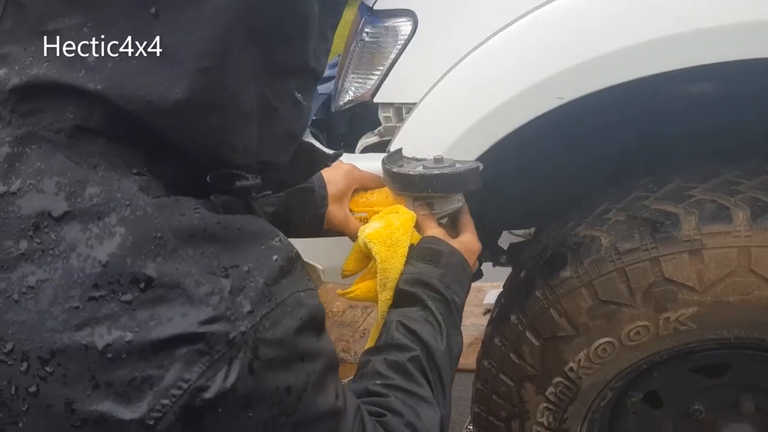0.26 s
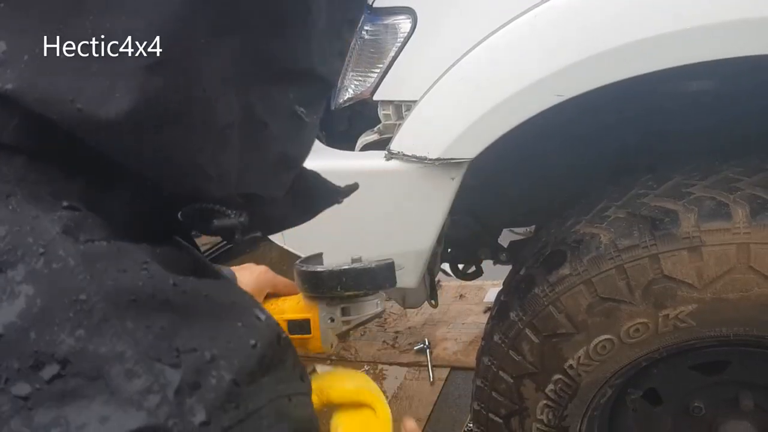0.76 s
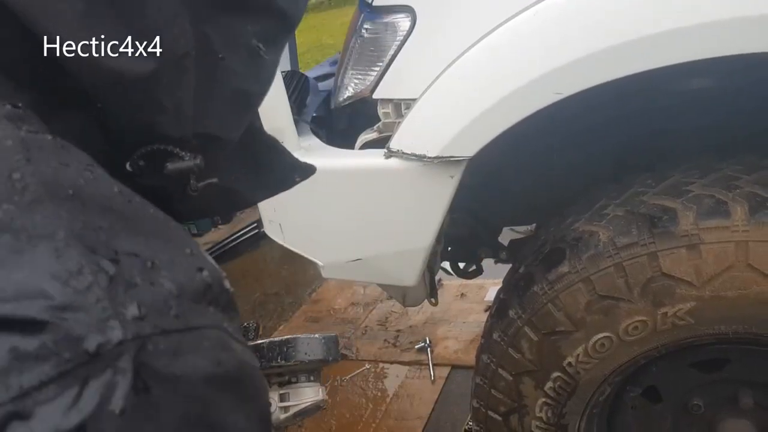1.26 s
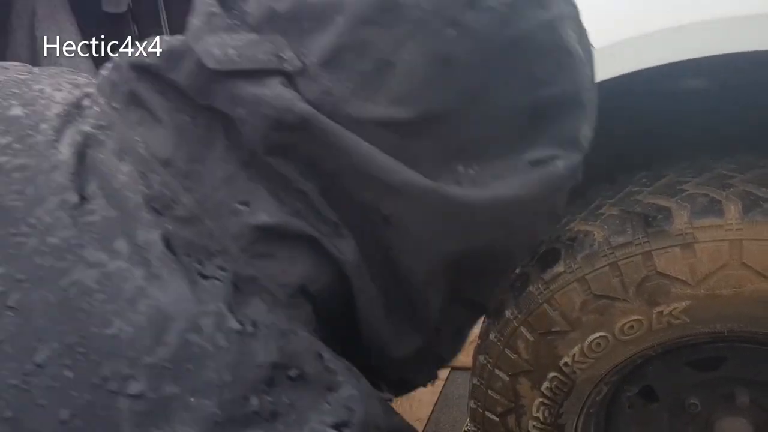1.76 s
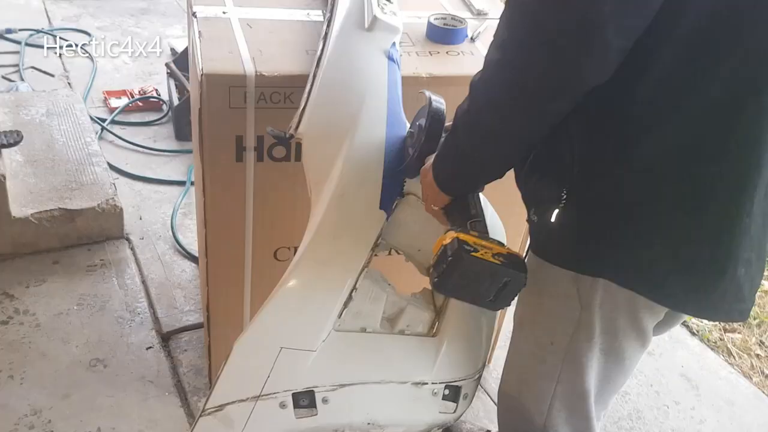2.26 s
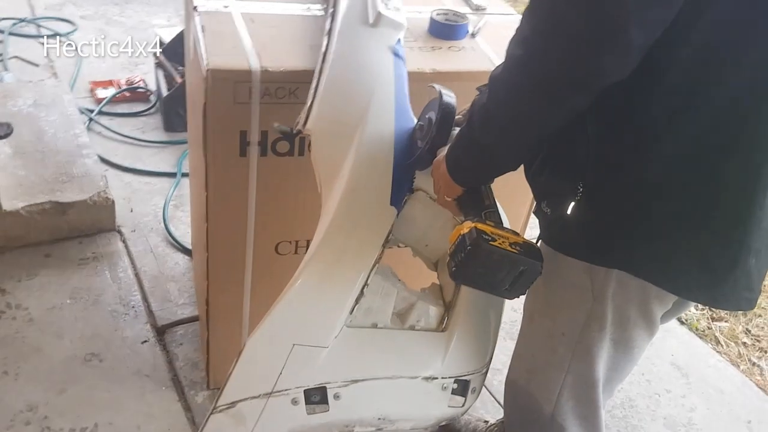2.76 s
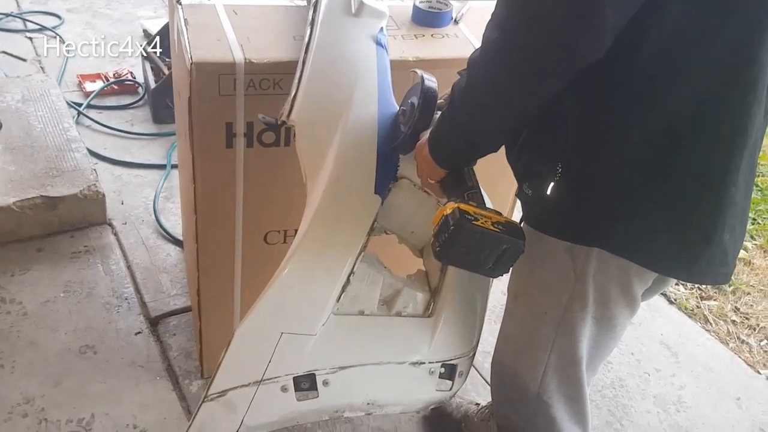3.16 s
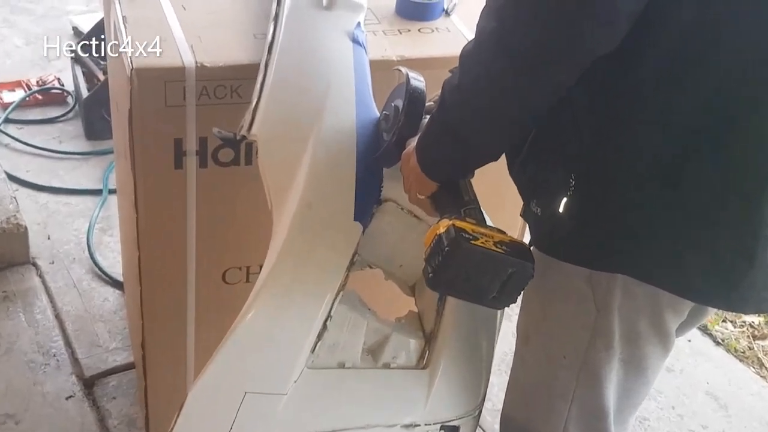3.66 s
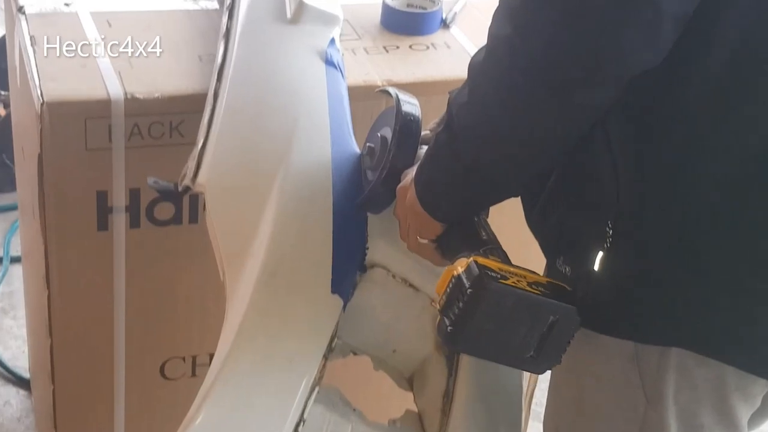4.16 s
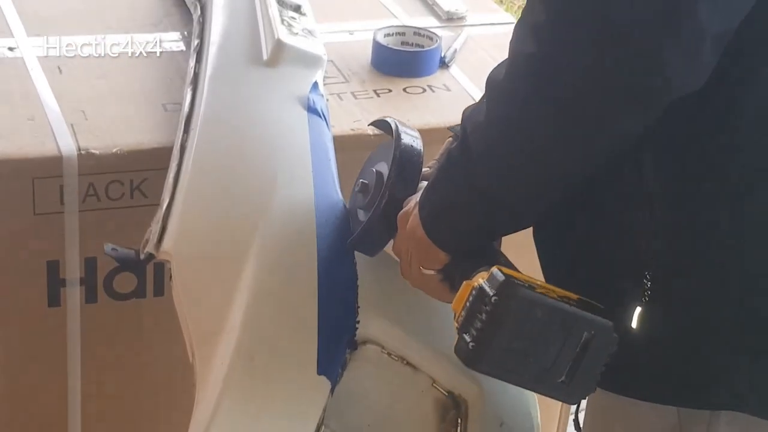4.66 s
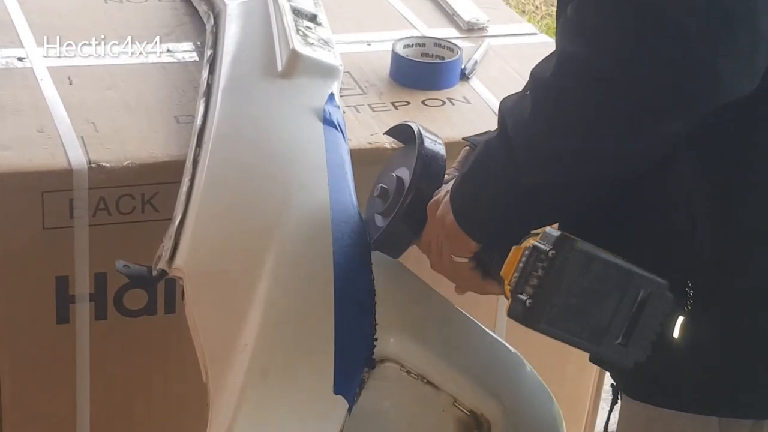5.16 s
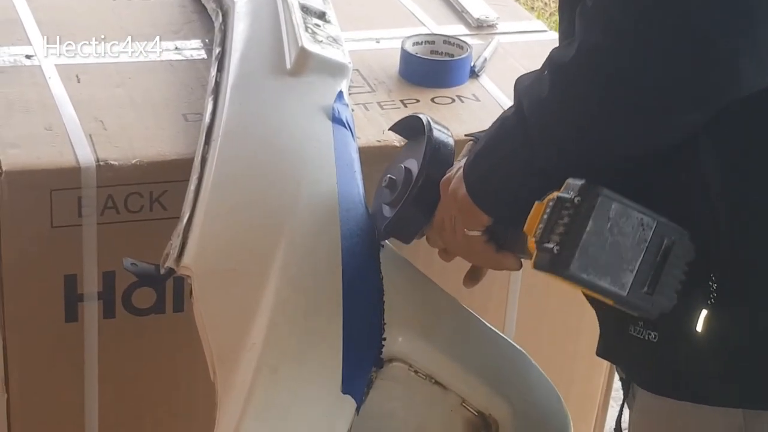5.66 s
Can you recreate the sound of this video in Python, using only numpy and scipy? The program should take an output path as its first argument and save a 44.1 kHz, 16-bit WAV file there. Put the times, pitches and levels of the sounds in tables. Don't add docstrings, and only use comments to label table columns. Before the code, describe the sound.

A grinder is already cutting at the start, loud and gritty, then leaves the slot and becomes a quieter steady hiss with a high gear whine that swells and fades. A short fade cuts to another take: the disc chews a loose panel, fuller and buzzing, bogging lowest before five seconds, then speeding up. Dry close outdoor stereo, stronger on the left, with faint wind thumps.

```python
import sys
import numpy as np
from scipy import signal
from scipy.fft import rfft, irfft, next_fast_len
from scipy.io import wavfile
from scipy.ndimage import uniform_filter1d

SR = 44100
rng = np.random.default_rng(int(sys.argv[2]) if len(sys.argv) > 2 else 0)


def store_pcm(level_fs):
    pcm = np.round(np.clip(level_fs, -1, 1) * 32767).astype(np.int16)
    wavfile.write(sys.argv[1], SR, np.atleast_2d(pcm).T)


def undo_db(level):
    steps = np.asarray(level, float) / 20
    return 10 ** steps


N = 260322

# start in seconds, end in seconds.
STAGES = [
    (0, .45),
    (.45, 2.27),
    (2.345, 5.9),
]
SCENE_CHANGE_S, FADE_OUT_S, FADE_IN_S = 2.308, .05, .047

FIRST_TURNS_PER_S, MESH_ORDER, USUAL_SPEED = 123.2, 28.575, 120
INERTIA_S = .04
WANDER_CYCLES = .07
LET_GO_S, LET_GO_HALF_S, LET_GO_RACE = .46, .05, .007
# time in seconds, speed in turns per second.
SPEED = [(2.35, 123.6), (2.46, 122.6), (2.52, 121.5), (2.87, 121.4), (2.96, 120.2), (3.06, 118.5),
         (3.25, 119.2), (3.32, 120.2), (3.68, 118.5), (3.72, 117.2), (3.77, 117.6), (3.93, 121.8),
         (3.99, 120.8), (4.23, 124.0), (4.39, 123.3), (4.46, 120.9), (4.59, 113.6), (4.63, 112.7),
         (4.77, 113.1), (4.91, 112.5), (5.0, 113.5), (5.13, 120.5), (5.3, 124.0), (5.68, 123.5),
         (5.9, 123.6)]

# time in seconds, pressure on the disc in dB, grip on the panel in dB.
FIRST_CUT = [
    (0, 0, -28.5),
    (.11, 1, -30),
    (.19, 2.5, -30),
    (.25, 4.5, -30.5),
    (.31, -1, -24),
    (.385, -4, -23),
    (.44, -3, -35),
    (.475, -20, -37.5),
    (.53, -16, -59),
]
USUAL_GRIP_DB = -30
# time in seconds, level in dB.
FREE_RUN = [(.47, -28), (.79, -27), (.88, -27.5), (1.1, -25.5), (1.42, -26.5), (1.62, -25), (1.96, -26.5),
            (2.14, -24.5), (2.27, -24)]
# time in seconds, pressure in dB.
SECOND_CUT = [(2.35, -19.5), (2.5, -21), (2.849, -21), (3.001, -19.5), (3.1, -19.5), (3.2, -20.5),
              (3.5, -20), (3.65, -20.5), (3.8, -19.5), (3.95, -19), (4.05, -18.5), (4.2, -20), (4.449, -16),
              (4.6, -15.5), (4.8, -17.5), (5.0, -17.5), (5.3, -20.5), (5.9, -20)]

RIM_STEPS = 1024
EVENNESS = .25
SETTLED_S = 1.62
# frequency in Hz, then the share (0-1) in the first cut,
# running free, in the second cut chattering, in the second cut running true.
REPEAT = [(500, .9, .08, .87, .9), (1400, .86, .08, .8, .84), (2800, .86, .08, .64, .8),
          (4300, .68, .05, .5, .76), (5800, .56, .04, .44, .58), (8100, .48, .04, .4, .46),
          (11500, .55, .03, .42, .84), (15000, .4, .03, .38, .5)]
# time in seconds, trueness (0 chattering, 1 true
RUNS_TRUE = [(2.35, .7), (2.9, 1), (3.05, .45), (3.6, .4), (3.85, .1), (4.38, .1), (4.5, -.3), (4.65, .5),
             (4.95, .5), (5.08, -.3), (5.25, 0), (5.9, 0)]
# lower edge in Hz, upper edge in Hz.
HISS_BANDS = [
    (150, 1200),
    (1200, 5000),
    (5000, 9000),
    (9000, 15500),
]
HISS_TRIM_DB = [
    (-8, -1.7, 0, 0),
    (7.5, -0.47, 0, 0),
    (-5.5, -2, 0, 0),
]
# level at the start in dB, share of the pressure swing,
# growth in dB per second, response in dB per unit of grip or speed.
HISS_LAW = [
    [(-34, 0.099, 21, 1), (-30.5, 0.54, 0.5, 0.62), (-35, 1, -8, 1.53), (-19.5, 0.87, -4.5, 0.75)],
    [(-61, 0.059, 6.5, 0), (-33, 0.86, -0.74, 0), (-32, 1.9, -2.1, 0), (-24, 1.2, -1, 0)],
    [(-28.5, 0.51, 1.06, 0.36), (-23, 1.08, -1.04, 0.25), (-33, 0.44, 4, 0.05), (-18.5, 1.08, -1.83, 0.14)],
]
# frequency in Hz, density in dB per Hz.
COLOUR = [
    [(53, -57), (90, -30.5), (188, -13), (243, -3), (309, -9), (367, -8), (427, -10), (872, -8),
     (1630, -21), (3630, -13), (8620, -18), (10900, -17), (15800, -26)],
    [(53, -44), (90, -23.5), (260, -23.5), (436, -21.5), (570, -22.5), (720, -18.5), (880, -20.5),
     (1040, -15), (1780, -14), (2410, -8.5), (3190, -9), (3400, -11), (3710, -7), (8620, -19), (9200, -18),
     (10900, -15.5), (15800, -31)],
    [(53, -48), (90, -7), (196, -5.5), (238, -20), (340, -2), (486, 1.5), (530, -7), (853, -1), (1040, -5),
     (3870, -2), (4600, -8.5), (5600, -10.5), (6800, -5.5), (8440, -13), (10900, -5.5), (15800, -21)],
]
# centre in Hz, width in Hz, #
# height in dB.
PEAK_AND_DIPS = [
    (10940, 900, 3),
    (7800, 370, -0.5),
    (4490, 510, -1.5),
    (8410, 140, -3),
]

FIRST_ORDERS = (2, 3, 4, 7, 5, 6, 8, 9, 10, 11, 12)
# level over the grip in dB, share of the swing in grip.
FIRST_HUM = [(-2, 1.18), (-14.5, 1.4), (-23.5, 1.1), (-20.5, 1.7), (-38, 1.4), (-25, 1.7), (-31, 1.2),
             (-31, 2.7), (-28, 2), (-28, 2), (-28.5, 1.2)]
OPENING_ORDERS = (20, 23, 26, 32, 42)
OPENING_REST_DB = -49.5
# middle in seconds, half length in seconds, level in dB.
OPENING_SWELLS = [
    [(.27, .04, -36), (.4, 0.034, -47)],
    [(.07, .08, -40)],
    [(.07, 0.074, -46), (.4, 0.018, -41)],
    [(.22, .07, -41)],
    [(.275, 0.018, -34)],
]

# middle in seconds,
# half length in seconds, level in dB.
HUM_ORDERS = (2, 4, 6, 7)
HUM_REST = [(-40, 0.5), (-76, 2), (-45, -0.84), (-78.5, 7)]
HUM_SWELLS = [
    [(4.263, 0.3, -44)],
    [(2.62, 0.21, -39), (3.1, 0.27, -37), (3.5, 0.17, -33.5), (4.03, 0.24, -29.5), (4.45, 0.11, -29.5),
     (5.55, 0.39, -34.5)],
    [(3.2, 1, -51), (3.68, 0.49, -41.5), (5.07, 0.022, -43), (5.85, 0.5, -37)],
    [(3.2, 0.61, -45.5), (4.04, 0.085, -34), (4.28, 0.29, -35), (4.58, 0.024, -39), (4.84, 0.018, -58),
     (5.05, 0.032, -34.5), (5.65, 0.53, -30.5)],
]
BUZZ_ORDERS = (1, 3, 9, 12, 14)
BUZZ_REST = [(-52.5, 0.23), (-75.5, 0.19), (-49, 0.22), (-45, 0.37), (-45, 0.15)]
BUZZ_SWELLS = [
    [(2.38, 0.056, -64), (2.62, 0.12, -59.5), (3.05, 0.029, -57), (4.3, 0.042, -49), (5.11, 0.059, -61),
     (5.6, 0.27, -49)],
    [(2.72, 0.41, -49), (3.58, 0.15, -45), (4.2, 0.41, -37.5), (4.78, 0.17, -51), (5.21, 0.085, -43),
     (5.6, 0.66, -41)],
    [(4.1, 0.22, -49), (4.48, 0.1, -43), (4.97, 0.1, -44), (5.65, 0.37, -44)],
    [(2.9, 0.21, -41.5), (4.33, 0.28, -40.5), (5.1, 0.13, -47), (5.75, 0.43, -48)],
    [(2.8, 0.25, -49), (4.15, 0.26, -40)],
]
WHINE_ORDERS = (28.47, 25, 27, 32)
WHINE_REST = [(-45, -0.27), (-58, -0.49), (-43.5, -0.63), (-37, -0.36)]
WHINE_SWELLS = [
    [(2.46, 0.045, -32), (2.85, 0.27, -38), (3.65, 0.15, -34), (5.2, 0.22, -46), (5.55, 0.1, -38)],
    [(2.72, 0.33, -33), (4.05, 0.67, -38.5), (4.35, 0.042, -39), (4.73, 0.14, -39.5), (5.5, 0.85, -34.5)],
    [(2.37, 0.07, -33), (2.8, 0.17, -34.5), (4.75, 0.43, -45)],
    [(2.46, 0.011, -30), (2.78, 0.33, -42), (3.9, 0.19, -43), (4.3, 0.13, -57), (4.5, 0.062, -31),
     (4.92, 0.068, -45), (5.12, 0.065, -48), (5.8, 0.19, -43)],
]
SLOT_ORDERS = (8, 10, 13, 15, 17, 23, 24, 28)
SLOT_REST = [(-54, 0.22), (-50.5, 0.13), (-51.5, -0.033), (-50.5, -0.11), (-52.5, -.1), (-44.5, -0.15),
             (-45, -0.41), (-44, 0.043)]
SLOT_SWELLS = [
    [(4.8, 0.42, -43.5), (5.65, 0.31, -43)],
    [(4.15, 0.24, -53), (5.7, 0.41, -51)],
    [(3.1, 0.081, -50), (3.65, 0.48, -44.5), (4.6, 0.36, -47)],
    [(2.5, 0.27, -42), (4.95, 0.28, -49.5)],
    [(2.95, 0.52, -46), (4.0, 0.13, -45), (4.72, 0.31, -48)],
    [(2.85, 0.12, -58), (3.95, 0.52, -40.5)],
    [(2.42, 0.056, -42), (4.0, 0.13, -55), (4.35, 0.1, -37), (5.4, 0.14, -41)],
    [(2.45, 0.03, -42), (4.3, 0.3, -49), (4.7, 0.24, -39)],
]
EDGE_ORDERS = (5, 11, 16, 19, 85, 91, 96)
EDGE_REST = [(-52.5, .05), (-49.5, .05), (-50, .05), (-49, .05), (-55, .05), (-44, .05), (-53, .05)]
EDGE_SWELLS = [
    [(2.42, 0.13, -44.5), (3.2, 0.65, -51), (4.2, 0.69, -51), (4.45, 0.04, -44), (4.75, 0.12, -55),
     (5.03, 0.23, -46), (5.5, 0.18, -46), (5.82, 0.09, -52)],
    [(4.15, 0.67, -48), (5.35, 0.24, -51), (5.7, 0.39, -53)],
    [(2.45, 0.06, -45), (3.8, 0.57, -60), (4.78, 0.054, -45), (5.5, .15, -63)],
    [(2.45, 0.39, -46), (4.0, 0.082, -60), (4.7, 0.29, -41), (5.45, 0.16, -43)],
    [(2.5, 0.16, -23.5), (5.55, .35, -57)],
    [(2.7, 0.16, -24.5), (3.15, 0.11, -40), (4.27, .15, -29)],
    [(4.75, .12, -38)],
]
STACK_ORDERS = (18, 20, 21, 22, 26, 29, 30, 31, 33, 35, 89, 94)
STACK_REST = [(-51.5, .1), (-46.5, .1), (-46, .05), (-46, 0.12), (-45, .05), (-50, -.1), (-47, -.1),
              (-41.5, -.1), (-51.5, 0.017), (-53, -.2), (-53, .05), (-59, .05)]
STACK_SWELLS = [
    [(4.3, 0.42, -46.5), (5.3, .15, -47)],
    [(2.45, .1, -40), (3.7, .3, -46), (4.2, 0.14, -53)],
    [(2.5, 0.2, -54), (3.7, 0.22, -44), (4.1, 0.11, -40), (4.5, 0.13, -44)],
    [(4.25, .3, -44.5), (5.5, .45, -47)],
    [(3.1, 0.24, -42), (4.7, 0.16, -39), (5.4, 0.47, -53)],
    [(3.9, 0.15, -44), (4.6, 0.14, -37)],
    [(2.6, 0.42, -50), (4.2, .2, -41), (4.75, 0.17, -42)],
    [(2.8, 0.17, -41), (3.4, 0.23, -47), (4.7, 0.09, -37)],
    [(2.45, 0.13, -55), (4.0, 0.22, -45), (5.2, 0.57, -61)],
    [(2.9, 0.61, -39), (4.6, 0.28, -43)],
    [(3.15, 0.28, -31.5), (5.55, 0.088, -35)],
    [(2.63, .25, -28), (2.43, 0.067, -34)],
]

# middle in seconds,
# half length in seconds, level in dB.
MESH_SWELLS = [(.14, 0.16, -47), (.46, 0.036, -36.5), (.6, 0.044, -51), (.75, 0.047, -36),
               (.92, 0.085, -47), (1.11, 0.1, -33), (1.33, 0.06, -38.5), (1.65, 0.13, -38),
               (1.82, .08, -32.5), (1.97, 0.04, -42), (2.14, 0.044, -31.5)]
MESH_REST_DB = -44
# ratio to mesh, level in dB.
MESH_PARTNERS = [
    (0.6893, -16),
    (0.9628, -18),
    (1.0718, -19),
    (1.998, -18),
    (2.3736, -9),
]
# ratio to mesh, level in dB.
ARMATURE = [(.1253, -60), (0.037, -61.5)]
ARMATURE_TURNS_S, ARMATURE_HIDDEN_DB = 1.3, -4.5
SWELL_SQUARENESS = 2.26

# frequency in Hz, left minus right in dB.
LEFT_LEAN = [(60, 1.5), (92, -6), (140, 19), (210, 4), (330, 7), (500, 9.5), (770, 17.5), (1170, 7),
             (1790, 17.5), (2740, 6.5), (4190, 4), (6410, 13.5), (9810, 16.5), (15000, -6)]
# frequency in Hz, correlation.
LIKENESS = [(100, 0.3), (300, 0.44), (700, 0.056), (1500, 0.11), (4000, 0.063), (10000, 0.12),
            (15000, 0.041)]
# frequency in Hz, phase in radians.
LEFT_LEADS = [(240, 0.28), (450, 0.47), (900, 0.67), (2000, 0.24), (5000, 0.074)]
FULL_LEAN_HZ, PORT_WANDER = 493, 0.71
FACES_PORTS_S, FACING_LIKENESS = 3.83, 0.23
# time in seconds, left minus right in dB plus 10.5.
PLACE = [(0, 9), (.75, 8), (1.25, 4.5), (1.75, 5.5), (2.3, 8), (2.32, 12), (2.8, 12.5), (3.2, 11),
         (4.2, 9.5), (4.75, 9), (5.9, 9.5)]
HAND_SHAKE_DB, HAND_SHAKE_PER_S = 0.73, 11

# middle in seconds, half length in seconds, level in dB.
GUSTS = [(.2, 0.19, -63.5), (0.805, 0.032, -73), (1.195, 0.018, -51), (1.324, 0.036, -60),
         (1.525, 0.04, -64), (1.84, 0.014, -57), (2.035, 0.028, -59), (2.303, 0.17, -71.5),
         (3.15, 0.051, -58), (3.974, 0.047, -56), (4.096, 0.089, -52), (4.6, .04, -60), (4.703, 0.13, -59),
         (5.01, 0.053, -58), (5.41, 0.094, -57), (5.793, 0.026, -64), (5.907, 0.017, -47)]
WIND_REST_DB = -72
CUTOFF_HZ = 15820


def unit(x):
    return x / np.sqrt(np.mean(x ** 2) + 1e-20)


def in_time(rows):
    s, *columns = np.transpose(rows)
    return [np.interp(np.arange(N) / SR, s, c) for c in columns]


def at_hz(points, hz):
    f, value = np.array(points)[:, :2].T
    return np.interp(np.log(hz), np.log(f), value)


def drift(rate, count):
    r = np.exp(-80 * np.pi * rate / SR)
    fresh = rng.standard_normal(count // 40 + 2002)
    slow = signal.lfilter([1], [1, -2 * r, r * r], fresh)[2000:]
    return np.interp(np.arange(count) / 40, np.arange(len(slow)), unit(slow))


def swells(rest_db, rows):
    at = np.arange(0, N, 64)
    rise = sum(undo_db(db) * np.exp(-np.abs((at / SR - s) / half_s) ** SWELL_SQUARENESS) for s, half_s, db in rows)
    rest = undo_db((rest_db + np.zeros(N))[at])
    return np.interp(np.arange(N), at, 20 * np.log10(rest + rise))


def rim(turns, memory, steady):
    fresh = rng.standard_normal((2, 800, RIM_STEPS))
    worn = signal.lfilter([1], [1, -memory], fresh, axis=1)[:, 60:]
    orders = rfft(worn)
    orders *= (np.abs(orders) + 1e-9) ** -EVENNESS
    orders[..., steady] *= .17
    bumps = irfft(orders).reshape(2, -1)
    bumps = signal.sosfilt(signal.butter(8, .29, output="sos"), bumps)
    return unit(np.array([np.interp(turns * RIM_STEPS, np.arange(len(b)), b) for b in bumps]))


def spray(turns, gate):
    press = 1 + gate * (np.cos(2 * np.pi * turns) + 0.11 * np.cos(4 * np.pi * turns + 1))
    return unit(rng.standard_normal((2, N)) * press)


def hiss_db(stage):
    pressure, grip = in_time(FIRST_CUT)
    free, second = (in_time(rows)[0] - np.mean(rows, axis=0)[1] for rows in (FREE_RUN, SECOND_CUT))
    sag = in_time(SPEED)[0] - USUAL_SPEED
    push, load = [(pressure, grip - USUAL_GRIP_DB), (free, 0), (second, sag)][stage]
    since = np.minimum(np.arange(N) / SR - STAGES[stage][0], SETTLED_S)
    return np.array([db + share * push + per_s * since + per_load * load
                     for db, share, per_s, per_load in HISS_LAW[stage]])


def hiss(stage, repeating, fresh, patchy_db, low_patchy_db):
    start = max(0, int((STAGES[stage][0] - .06) * SR))
    stop = min(N, int((STAGES[stage][1] + .06) * SR))
    count = stop - start
    size = next_fast_len(count)
    hz = np.maximum(np.arange(size // 2 + 1) * SR / size, 1)
    mid, other = rfft(np.stack([repeating, fresh], axis=1)[..., start:stop], size)
    port_db = sum(db / (1 + (2 * (hz - centre_hz) / width_hz) ** 2) for centre_hz, width_hz, db in PEAK_AND_DIPS)
    colour = undo_db(at_hz(COLOUR[stage], hz) + port_db)
    lean = undo_db(at_hz(LEFT_LEAN, hz) / 2)
    parts = np.stack([mid * lean, mid * np.exp(-1j * at_hz(LEFT_LEADS, hz)) / lean, other / lean], axis=1)
    parts = parts * colour / np.sqrt((lean ** 2 + lean ** -2 + 2 * at_hz(LIKENESS, hz)) / 4)
    band_db = [10 * np.log10(2 * np.sum(colour[(hz > a) & (hz < b)] ** 2) / size) for a, b in HISS_BANDS]
    gains = hiss_db(stage)[:, start:stop] + np.subtract(HISS_TRIM_DB[stage], band_db)[:, None]
    true = in_time(RUNS_TRUE)[0][start:stop] * (stage == 2)
    facing = np.clip((np.arange(start, stop) / SR - FACES_PORTS_S) / .3 + .5, 0, 1)
    shares = np.array(REPEAT)
    best_column = 4 if stage == 2 else stage + 1
    out, together = np.zeros((2, N)), drift(2.8, count)
    for centre in 90 * 2 ** np.arange(0, 8, .5):
        window = np.cos(np.pi * np.clip(np.log2(hz / centre), -.5, .5)) ** 2
        bumps, chips = irfft(parts * window, size)[..., :count]
        place = np.interp(np.log(centre), np.log([500, 2800, 6700, 11000]), range(4))
        below, above = gains[int(place)], gains[min(int(place) + 1, 3)]
        level = below + (place % 1) * (above - below)
        usual = at_hz(shares[:, [0, stage + 1]], centre)
        best = at_hz(shares[:, [0, best_column]], centre)
        share = np.clip(usual + true * (best - usual), .02, .98)
        own_db = 1.4 * patchy_db + low_patchy_db * (centre < 1300)
        flicker = patchy_db * together + own_db * drift(3.3, count)
        left, same, apart = undo_db(level + flicker) * (np.sqrt(share) * bumps + np.sqrt(1 - share) * chips)
        alike = np.clip(at_hz(LIKENESS, centre) + FACING_LIKENESS * facing * (centre > 2500), 0, .99)
        out[:, start:stop] += [left, alike * same + np.sqrt(1 - alike ** 2) * apart]
    return out


def tone(cycles, level_db, lean_db, wobble_db):
    hz = cycles[-1] * SR / N
    phase = 2 * np.pi * (cycles + rng.random() + WANDER_CYCLES * drift(9.4, N))
    height = np.sqrt(2) * undo_db(level_db + wobble_db * drift(9, N))
    lag = at_hz(LEFT_LEADS, hz) + PORT_WANDER * min(hz / FULL_LEAN_HZ, 1.6) * drift(4.6, N)
    lean = undo_db(lean_db * min(hz / FULL_LEAN_HZ, 1) / 2)
    return height * np.array([lean * np.sin(phase), np.sin(phase - lag) / lean])


def lines(turns, orders, levels_db, lean_db, wobble_db):
    return sum(tone(k * turns, db, lean_db, wobble_db) for k, db in zip(orders, levels_db))


def rung(rest, rows, speed):
    return [swells(db + per_turn * (speed - USUAL_SPEED), own) for (db, per_turn), own in zip(rest, rows)]


def first_panel(turns):
    grip = in_time(FIRST_CUT)[1] - USUAL_GRIP_DB
    hum_db = [USUAL_GRIP_DB + db + share * grip for db, share in FIRST_HUM]
    opening_db = [swells(OPENING_REST_DB, own) for own in OPENING_SWELLS]
    hum = lines(turns, FIRST_ORDERS, hum_db, lean_db=6.5, wobble_db=.8)
    return hum + lines(turns, OPENING_ORDERS, opening_db, lean_db=4.0, wobble_db=2.0)


def loose_panel(turns, speed):
    families = [(HUM_ORDERS, HUM_REST, HUM_SWELLS, 6.0, .8), (BUZZ_ORDERS, BUZZ_REST, BUZZ_SWELLS, 6.5, 1.0),
                (WHINE_ORDERS, WHINE_REST, WHINE_SWELLS, 7.0, 2.5),
                (SLOT_ORDERS, SLOT_REST, SLOT_SWELLS, 13.5, 2.5),
                (EDGE_ORDERS, EDGE_REST, EDGE_SWELLS, 5.5, 2.0),
                (STACK_ORDERS, STACK_REST, STACK_SWELLS, 6.0, 3.0)]
    return sum(lines(turns, orders, rung(rest, rows, speed), lean_db, wobble_db)
               for orders, rest, rows, lean_db, wobble_db in families)


def gears_free(turns):
    t = np.arange(N) / SR
    race = LET_GO_RACE * np.exp(-((t - LET_GO_S) / LET_GO_HALF_S) ** 4)
    cycles = MESH_ORDER * np.cumsum(np.gradient(turns) * (1 + race))
    mesh = tone(cycles, swells(MESH_REST_DB, MESH_SWELLS), lean_db=14.5, wobble_db=1.5)
    partners = sum(tone(ratio * cycles, -37.0 + db, lean_db=12.0, wobble_db=2.5) for ratio, db in MESH_PARTNERS)
    hidden_db = ARMATURE_HIDDEN_DB * np.clip((ARMATURE_TURNS_S - t) / .2, 0, 1)
    shaft = sum(tone(ratio * cycles, db + hidden_db, lean_db=14.0, wobble_db=-0.5) for ratio, db in ARMATURE)
    return mesh + partners + shaft


def wind():
    common, *own = rng.standard_normal((3, N))
    band = signal.butter(2, [32.0, 150], "band", fs=SR, output="sos")
    low = signal.sosfilt(band, common + 2.2 * np.array(own))
    return unit(low * undo_db(1.4 * drift(7.8, N))) * undo_db(swells(WIND_REST_DB, GUSTS) + 9.0)


def scene():
    t = np.arange(N) / SR
    second_speed = uniform_filter1d(in_time(SPEED)[0], size=int(INERTIA_S * SR))
    speed = np.where(t < SCENE_CHANGE_S, FIRST_TURNS_PER_S, second_speed)
    turns = np.cumsum(speed * (1 + .0004 * drift(25, N))) / SR
    chips = spray(turns, gate=.15)

    first_rim = rim(turns, memory=.92, steady=FIRST_ORDERS + OPENING_ORDERS)
    lifted = np.clip((t - .4) / 0.14, 0, 1)
    first = np.sqrt(1 - lifted) * hiss(0, first_rim, chips, patchy_db=1.0, low_patchy_db=1.0)
    first += np.sqrt(lifted) * hiss(1, first_rim, chips, patchy_db=0.3, low_patchy_db=1.2)
    first += first_panel(turns) + gears_free(turns)

    steady = HUM_ORDERS + BUZZ_ORDERS + SLOT_ORDERS + EDGE_ORDERS[:4] + WHINE_ORDERS[1:] + STACK_ORDERS[:10]
    second_rim = rim(turns, memory=.92, steady=steady)
    second = hiss(2, second_rim, chips, patchy_db=0.75, low_patchy_db=-0.5)
    second += loose_panel(turns, speed)

    pan = undo_db((in_time(PLACE)[0] - 10.5) / 2 * np.array([[1], [-1]]))
    pan = pan * undo_db(HAND_SHAKE_DB * drift(HAND_SHAKE_PER_S, N))
    return pan * np.where(t < SCENE_CHANGE_S, first, second) + wind()


def mask_weak_bands(x, below_db, depth_db):
    cells = signal.stft(x, nperseg=2048, noverlap=1024, window="cosine")[2]
    power = np.sum(np.abs(cells) ** 2, axis=0)
    narrow_db = 10 * np.log10(uniform_filter1d(power, size=6, axis=0).clip(1e-20))
    usual_db = uniform_filter1d(narrow_db, size=60, axis=0)
    without_tones = np.minimum(narrow_db, usual_db + 4)
    usual_db = uniform_filter1d(without_tones, size=60, axis=0) + .5
    under_db = narrow_db - usual_db - below_db
    kept = undo_db(depth_db / (1 + np.exp(np.clip(2 * under_db, -20, 20))))
    return signal.istft(cells * kept, nperseg=2048, noverlap=1024, window="cosine")[1][:, :N]


def roll_off(x):
    return signal.sosfilt(signal.butter(12, 16230, fs=SR, output="sos"), x)


def record(dry):
    sparse = mask_weak_bands(np.clip(dry, -1, 1), below_db=-3.4, depth_db=-17)
    t = np.arange(N) / SR
    away = np.maximum((SCENE_CHANGE_S - t) / FADE_OUT_S, (t - SCENE_CHANGE_S) / FADE_IN_S)
    fade = np.sin(np.pi / 2 * np.clip(away, .1, 1)) ** 2
    mix = signal.sosfilt(signal.ellip(14, .3, 60, CUTOFF_HZ, fs=SR, output="sos"), fade * sparse)
    return roll_off(mix)


dry = scene()
out = record(dry)
store_pcm(out)
```